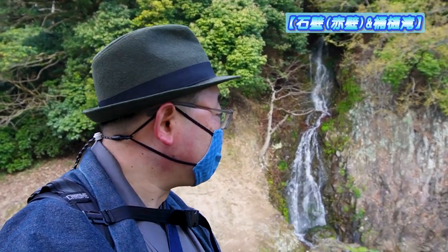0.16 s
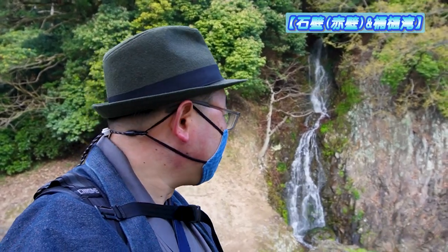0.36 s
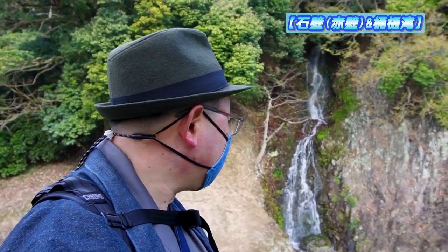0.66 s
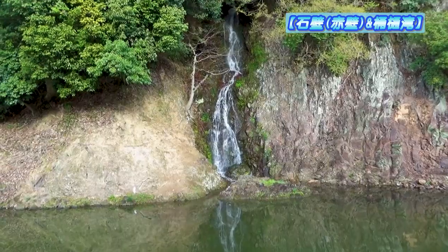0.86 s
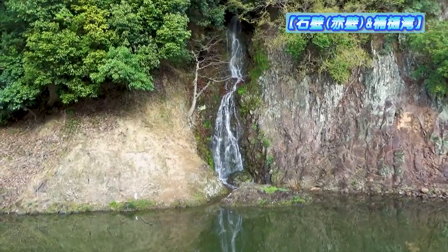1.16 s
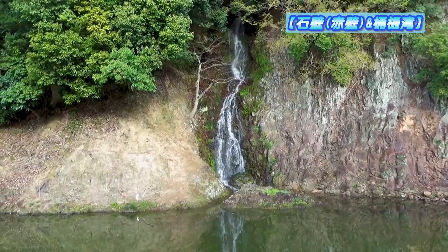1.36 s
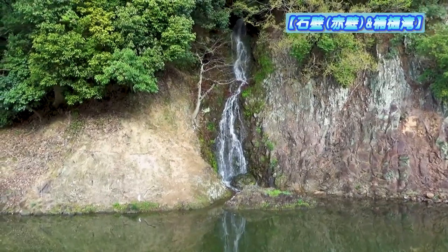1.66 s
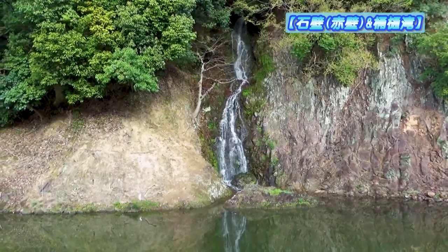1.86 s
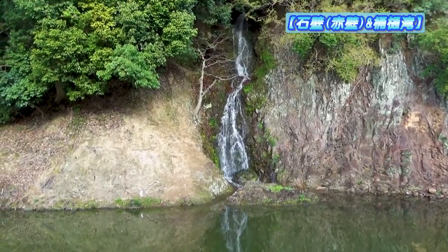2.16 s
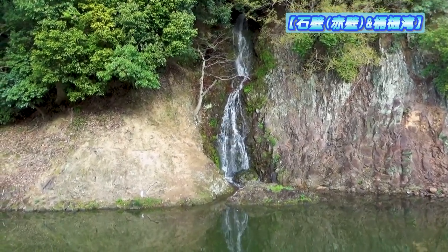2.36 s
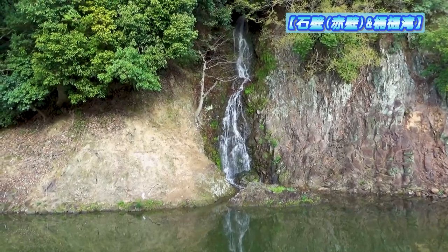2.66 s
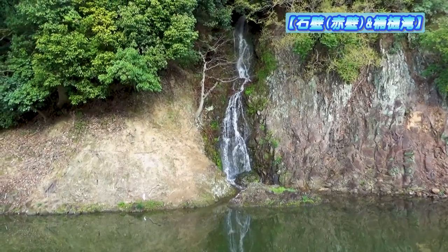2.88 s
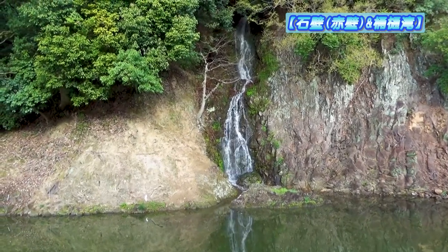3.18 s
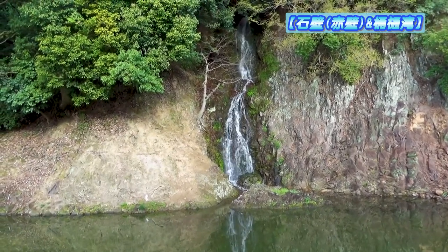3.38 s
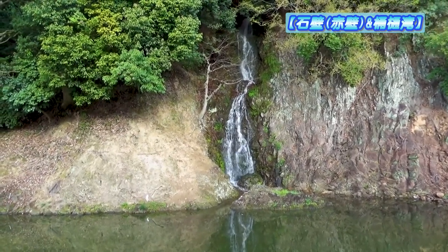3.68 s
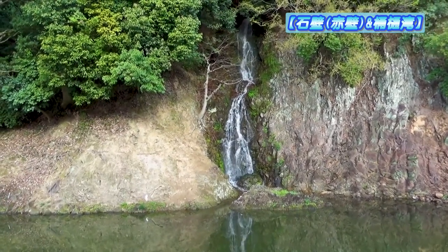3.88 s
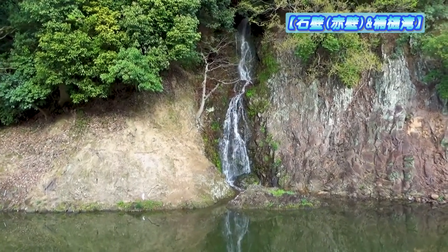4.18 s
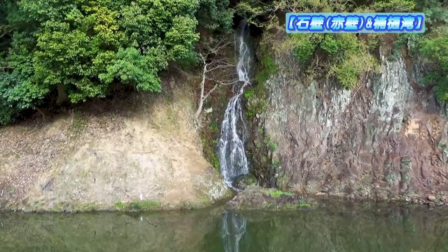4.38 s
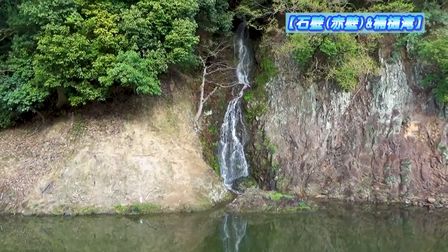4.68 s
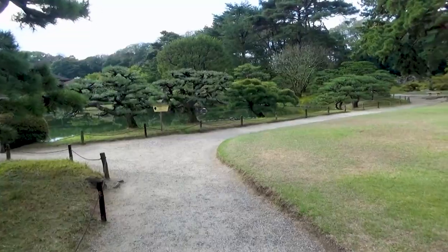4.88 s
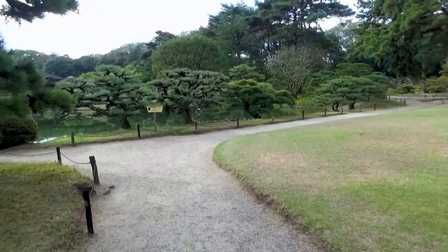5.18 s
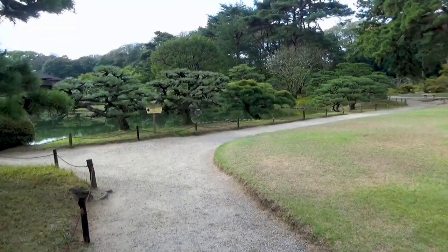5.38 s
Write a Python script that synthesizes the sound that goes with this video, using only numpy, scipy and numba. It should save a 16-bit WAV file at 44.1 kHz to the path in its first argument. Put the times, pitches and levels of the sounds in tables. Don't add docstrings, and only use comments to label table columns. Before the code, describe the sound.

A thin bright trickle jumps to a fuller steady rush of a small waterfall into a pond, then a duller, wider water wash with gravelly footsteps.

```python
import sys
import numpy as np
from scipy import signal
from scipy.fft import rfft, irfft, next_fast_len
from scipy.io import wavfile
from scipy.ndimage import uniform_filter1d
from numba import njit

SR = 44100
rng = np.random.default_rng(int(sys.argv[2]) if len(sys.argv) > 2 else 0)


def dump(signal):
    limited = np.clip(np.atleast_2d(signal).T, -1, 1)
    pcm = np.round(limited * 32767).astype(np.int16)
    wavfile.write(sys.argv[1], SR, pcm)


def decibels_to_gain(level_db):
    exponent = np.asarray(level_db, float) / 20
    return 10 ** exponent


N = 244049

# (start [s], end [s])
SPOT_TIMES = [
    (0, .79),
    (.79, 4.8),
    (4.8, 5.53),
]
# (fully in at [s], rise [dB/s], starts out at [s], fall [dB/s])
SPOT_FADES = [
    (0, 0, .7, 220),
    (.86, 207, 4.69, 141),
    (4.98, 75, 5.53, 0),
]
# (time [s], level [dB])
RUSH_FLOW = [
    [(0, -45), (.075, -48), (.13, -46), (.62, -47), (.7, -46.5)],
    [(.86, -50), (1.25, -49.5), (1.31, -49), (1.62, -48), (1.8, -47.5), (1.88, -47), (2.02, -48),
     (2.07, -46.5), (2.2, -46.5), (2.6, -46), (2.9, -45.5), (2.97, -44.5), (3.2, -43.5), (3.29, -45.5),
     (3.4, -44), (3.95, -44), (4.05, -42.5), (4.45, -42), (4.55, -44), (4.62, -44), (4.65, -45.5),
     (4.7, -48.5)],
    [(5.0, -46.5), (5.24, -45), (5.29, -45.5), (5.33, -44.5), (5.44, -46), (5.47, -44), (5.53, -48.5)],
]
# (frequency [Hz], level [dB per Hz])
BANK_COLOUR = [(24, -97), (40, -74), (76, -56), (150, -43.5), (320, -38.5), (687, -24), (1160, -15.5),
               (1590, -10), (2020, -6.5), (2880, -6), (4300, -7), (5910, -10.5), (8000, -17),
               (10500, -22.5), (12100, -32)]
FALL_COLOUR = [(24, -70), (40, -69), (78, -18.5), (132, -13.5), (492, -14.5), (894, -6.5), (1060, -10),
               (1280, -3.5), (1510, -5), (1750, -0.5), (2200, -2.5), (3300, -7), (4650, -9.5), (6000, -15),
               (6600, -12.5), (9150, -18), (10300, -14.5), (11200, -16), (12100, -22.5), (15700, -51),
               (22000, -120)]
PATH_COLOUR = [(30, -75.5), (100, -29), (178, -10), (260, -25), (408, -11.5), (481, -19.5), (542, -12),
               (934, -14), (1240, -9), (1500, -5.5), (1770, -2), (2300, -3.5), (5650, -11), (8860, -19),
               (12100, -27)]
# (frequency [Hz], level [dB per Hz])
BANK_MIST_COLOUR = [(12200, -2), (13500, -11), (14400, -17), (15000, -26)]
FALL_MIST_COLOUR = [(12200, -1), (13500, -8), (14500, -13), (15700, -22)]
PATH_MIST_COLOUR = [(12200, 0), (13000, -1), (14000, -7), (14300, -40)]
# (frequency [Hz], correlation [-1..1])
BANK_LIKENESS = [(60, 0.85), (130, 0.99), (290, 0.99), (640, 1), (1410, 0.99), (3100, 1), (6820, 0.93),
                 (15000, 0.73)]
FALL_LIKENESS = [(60, 1), (15000, 1)]
PATH_LIKENESS = [(60, .96), (160, .995), (380, .75), (800, .95), (1700, .99), (2400, .95), (3300, .72),
                 (5000, .75), (6820, .6), (10500, .1), (12000, -.2), (13500, -.4)]
# (frequency [Hz], difference [dB])
BANK_BALANCE = [(60, -3), (110, -4), (200, 0.0), (380, -1), (700, -2), (1290, -3), (2380, -3), (4400, -2),
                (8120, -3), (15000, -0.5)]
FALL_BALANCE = [(60, 0), (15000, 0)]
PATH_BALANCE = [(60, 0.5), (110, 0.5), (200, 0), (380, 0.5), (700, 3.0), (1290, 3.5), (2380, 4),
                (4400, 4.5), (8120, 0.5), (15000, -4)]
# (first level [dB], last level [dB], from [s], to [s])
MIST_DRIFT = [
    (-23, -33.5, .4, 0.83),
    (-14.5, -27, 0.95, 1.9),
    (-23, -28, 4.9, 5.05),
]
# (bass change [dB], treble change [dB], from [s], to [s])
TONE_DRIFT = [
    (-2.5, -0.5, 0.24, .6),
    (1.5, -4.5, 1, 1),
    (2, -9.5, 5, 5.06),
]
DEEP_BASS_FOLLOW = [4.0, .9, .9]
# (start [s], pitch [Hz], level [dB], t60 [s])
AIR_GULPS = [
    (2.74, 188.3, -57, 0.58),
    (3.46, 242, -54.5, 0.41),
    (4.051, 128, -56, .4),
]
# (time [s], peak level [dB], pitch [Hz])
GOUTS = [(0.937, -40, 2340), (1.1064, -40, 1820), (1.2885, -40, 2150), (1.41, -44, 1780),
         (1.5145, -38, 2150), (1.54, -41, 1730), (1.5992, -41, 1600), (1.6498, -38, 1800),
         (1.7075, -41, 1670), (1.7479, -40, 2070), (1.849, -37, 1870), (1.9394, -40, 2260),
         (2.0444, -38, 1640), (2.071, -36, 1710), (2.235, -36, 1640), (2.3411, -35, 1790),
         (2.6504, -40, 2620), (2.749, -38, 1780), (2.769, -40, 1620), (2.799, -38, 2660),
         (2.9532, -37, 1750), (2.9994, -40, 2300), (3.7354, -37, 1830), (3.8734, -35, 1740),
         (3.922, -37, 1700), (3.9845, -37, 1740), (4.0165, -43, 2290), (4.0594, -30, 2410),
         (4.3094, -37.5, 2110), (4.3864, -39, 1580), (4.4294, -33, 2020), (4.4544, -36, 2450),
         (4.5682, -33, 1780), (4.6024, -32.5, 1870), (4.6694, -39, 1820), (4.6944, -44, 1950)]
# (end [s], length as a negative [s], last pitch [Hz], first pitch [Hz], level [dB])
WHISTLING_JET = (4.435, -0.2, 2520, 2331, -53)
# (start [s], length [s], first pitch [Hz], highest pitch [Hz], last pitch [Hz])
BIRD_CALLS = [
    (4.888, .086, 3380, 3660, 3050),
    (5.454, 0.044, 4350, 4750, 4800),
]
# (time [s], blow [dB], brightness [dB])
STONE_BLOWS = [
    (5.028, -54, 0),
    (5.075, -52, 3),
    (5.346, -48, 3),
    (5.3585, -44, -1),
    (5.3605, -42, -1),
    (5.3638, -44, 3),
    (5.3646, -43, 3),
    (5.3655, -42, 2),
]
# (pitch [Hz], level [dB], t60 [s])
STONE_MODES = [(370, -9, .04), (545, -10, .04), (820, -9, .03), (1250, -10, .02), (1650, -16, .015),
               (2050, 1, .03), (2350, 3, .022), (3200, -3, .011), (3900, 6, .022), (4950, 2, .018),
               (6500, -8, .008)]
# (time [s], pitch [Hz], level [dB], t60 [s])
SOLE_THUDS = [(4.975, 191, -46, .4), (5.075, 188, -45, 0.22), (5.16, 180, -45, .2), (5.215, 190, -40, 0.16),
              (5.301, 174, -45, 0.22), (5.022, 645, -59, .12), (5.072, 814, -56, .1),
              (5.082, 410, -48, .12), (5.105, 356, -55, .1), (5.144, 395, -48, 0.088),
              (5.204, 420, -51, 0.11), (5.212, 550, -50.5, 0.16), (5.222, 400, -55, .1),
              (5.265, 1264, -47, .1), (5.272, 800, -58, 0.11), (5.356, 820, -45, .09),
              (5.357, 385, -46, .1), (5.358, 560, -51, .07)]
# (time [s], low edge [Hz], high edge [Hz], level [dB])
SIDE_FLASHES = [
    (1.895, 6300, 8300, -63),
    (2.5, 4700, 5700, -61),
    (2.825, 9600, 11100, -63),
    (3.5, 11000, 12400, -67),
    (4.245, 6300, 7600, -58),
]
# (time [s], frequency [Hz])
CENTRE_CEILING = [(4.66, 15700), (4.72, 15100), (4.76, 14300), (4.8, 13500), (4.825, 12400), (4.86, 13000),
                  (4.95, 12800), (4.99, 12500), (5.08, 13100), (5.12, 12400), (5.2, 11800), (5.255, 11600),
                  (5.275, 13100), (5.36, 13300), (5.4, 14000), (5.45, 13000), (5.49, 12400), (5.53, 12800)]

MIST_EDGE_HZ = 12170


def on_log(table, hz):
    f, v = np.transpose(table)
    return np.interp(np.log(hz + 1), np.log(f), v)


def unit(x):
    return x / np.sqrt(np.mean(x ** 2))


def walk(rate, size):
    hold = int(SR / rate)
    w = np.repeat(rng.standard_normal(size // hold + 1), hold)
    w = uniform_filter1d(uniform_filter1d(w, hold), hold)[:size]
    return unit(w - uniform_filter1d(w, size=4 * hold))


@njit
def rings(size, at, step, decay, glide, gain):
    y = np.zeros(size)
    for k in range(len(at)):
        i, a, phase, w = at[k], 1., 0., step[k]
        while a > .004 and i < size:
            y[i] += gain[k] * a * np.sin(phase)
            i, a, phase, w = i + 1, a * decay[k], phase + w, w * glide[k]
    return y


def fade(t, spot):
    full, rise, leave, fall = SPOT_FADES[spot]
    return -rise * np.clip(full - t, 0, 1) - fall * np.clip(t - leave, 0, 1)


def pump():
    hum_hz, hum_db, strain_db, eases_s = 140.8, -78.5, 2, 2.4
    t, start = np.arange(N) / SR, SPOT_FADES[1][0]
    climb = (2 * t - start - eases_s) / (eases_s - start)
    strain = np.where(t < eases_s, climb, np.clip(1 - (t - eases_s) / 0.77, 0, 1))
    level_db = hum_db + strain_db * strain + 2 * fade(t, spot=1) + 2.5 * walk(12.0, N)
    phase = 2 * np.pi * np.cumsum(hum_hz * (1 + 0.022 * walk(8.0, N))) / SR
    return np.sqrt(2) * decibels_to_gain(level_db) * np.sin(phase)


def bird():
    t, out = np.arange(N) / SR, 0
    peak = .56
    for (s, length, first_hz, top_hz, last_hz), db in zip(BIRD_CALLS, (-58, -63)):
        u = np.clip((t - s) / length, 0, 1)
        below_rising = (top_hz - first_hz) * (1 - u / peak) ** 2
        below_falling = (top_hz - last_hz) * (np.clip(u - peak, 0, 1) / (1 - peak)) ** 2.5
        hz = top_hz - np.where(u < peak, below_rising, below_falling)
        phase = 2 * np.pi * np.cumsum(hz * (1 + .006 * walk(150.0, N))) / SR
        swell = np.sin(np.pi * u).clip(0) ** 0.35 * (1 + .5 * u)
        out = out + np.sqrt(2) * decibels_to_gain(db + 2.2 * walk(90.0, N)) * swell * np.cos(phase)
    return out * decibels_to_gain(np.array([[3.0], [-3.0]]))


def stone_knocks():
    grit_db, grit_s = -6, .005
    hz, db, t60 = np.transpose(STONE_MODES)
    s, blow_db, bright_db = np.transpose(STONE_BLOWS)[:, :, None]
    chance = rng.standard_normal((len(STONE_BLOWS), 2, len(STONE_MODES)))
    bright = bright_db * on_log([(400, 0), (2000, 1)], hz)
    gain = decibels_to_gain(blow_db + db + bright + 1.5 * chance[:, 0])
    step = 2 * np.pi * hz * (1 + .025 * chance[:, 1]) / SR
    at = (s * SR + 0 * hz).astype(np.int64)
    decay = np.exp(-np.log(1000) / (t60 * SR)) + 0 * s
    ringing = rings(N, at.ravel(), step.ravel(), decay.ravel(), np.ones(at.size), gain.ravel())
    blows = np.bincount(at[:, 0], decibels_to_gain(blow_db + bright_db + grit_db)[:, 0], N)
    grit = signal.lfilter([1], [1, -np.exp(-1 / (grit_s * SR))], blows) * rng.standard_normal(N)
    return ringing + grit


def sole_thuds():
    t, out = np.arange(N) / SR, np.zeros(N)
    for s, hz, db, t60 in SOLE_THUDS:
        age = np.clip(t - s, 0, None)
        swell = 2 * decibels_to_gain(db - 60 * age / t60) * (1 - np.exp(-age / 0.0051))
        out += swell * np.sin(2 * np.pi * hz * age * (1 - .5 * age))
    return out


def footstep():
    contact = signal.butter(3, [320, 7500], "bandpass", fs=SR, output="sos")
    y = signal.sosfilt(contact, stone_knocks() + sole_thuds())
    return np.array([y, np.roll(y, 2)]) * decibels_to_gain(np.array([[2.0], [-2.0]])) / 2


def gulps():
    t, out = np.arange(N) / SR, np.zeros(N)
    for s, hz, db, t60 in AIR_GULPS:
        age = np.clip(t - s, 0, None)
        swell = decibels_to_gain(db - 60 * age / t60) * (1 - np.exp(-age / 0.019))
        out += swell * np.sin(2 * np.pi * hz * age * (1 + 0.16 * age))
    return out


def splashes(count=7):
    level_db, rush_s, cycles, pitch_spread = -8, .015, 9.0, .12
    s, db, hz = np.transpose(GOUTS)[:, :, None]
    u = rng.random((len(GOUTS), 3, count))
    hz = hz * (1 + pitch_spread * (2 * u[:, 0] - 1))
    life = cycles * SR / hz
    at = ((s - rush_s * np.log(1 - .9 * u[:, 1])) * SR).astype(np.int64)
    gain = decibels_to_gain(db + level_db - 7.1 * u[:, 2])
    step, decay, glide = 2 * np.pi * hz / SR, np.exp(-1 / life), 1.05 ** (.5 / life)
    out = rings(N, at.ravel(), step.ravel(), decay.ravel(), glide.ravel(), gain.ravel())
    return signal.sosfilt(signal.butter(2, 900, "highpass", fs=SR, output="sos"), out)


def jet():
    s, length, first_hz, last_hz, db = WHISTLING_JET
    u = np.clip((np.arange(N) / SR - s) / length, 0, 1)
    hz = (first_hz + (last_hz - first_hz) * u) * (1 + 0.012 * walk(120.0, N))
    swell = np.sqrt(2 * np.sin(np.pi * u).clip(0))
    return decibels_to_gain(db + 3 * walk(80.0, N)) * swell * np.sin(2 * np.pi * np.cumsum(hz) / SR)


def churn(size, rate=5000, cycles=5.0, rise=.2, spread_db=1.8, bubble_db=-8.0):
    when, pitch, strength = rng.random((int(rate * size / SR), 3)).T
    hz = 200 * (14000 / 200) ** pitch
    life = cycles * SR / hz
    gain = hz * decibels_to_gain(-spread_db * np.log(1 - .995 * strength))
    at, step = (when * size).astype(np.int64), 2 * np.pi * hz / SR
    bubbles = rings(size, at, step, np.exp(-2 / life), (1 + rise) ** (.5 / life), gain)
    return decibels_to_gain(bubble_db) * unit(bubbles) + rng.standard_normal(size)


def wide_churn(size, fft_size, hz, alike, lean, lead_us):
    c = np.clip(on_log(alike, hz), -1, 1)
    mid = rfft(churn(size), fft_size) * np.sqrt((1 + c) / 2)
    side = rfft(churn(size), fft_size) * np.sqrt((1 - c) / 2)
    tilt = decibels_to_gain(on_log(lean, hz) / 2) * np.exp(1j * np.pi * hz * lead_us * 1e-6)
    return np.array([(mid + side) * tilt, (mid - side) / tilt])


def cascade(spot, colour, mist, alike, lean, lead_us, swell_db, patch_db, flicker_db):
    start, end = SPOT_TIMES[spot]
    i0, i1 = max(int((start - .1) * SR), 0), min(int((end + .1) * SR), N)
    size = i1 - i0
    fft_size = next_fast_len(size)
    t, hz = np.arange(i0, i1) / SR, np.fft.rfftfreq(fft_size, 1 / SR)
    first_db, last_db, *mist_times = MIST_DRIFT[spot]
    rush_db = np.interp(t, *np.transpose(RUSH_FLOW[spot])) + fade(t, spot)
    mist_db = rush_db + np.interp(t, mist_times, (first_db, last_db))

    pair = wide_churn(size, fft_size, hz, alike, lean, lead_us)
    body = pair * decibels_to_gain(on_log(colour, hz)) * (hz < MIST_EDGE_HZ)
    core = (hz > 1000) & (hz < 6000)
    body /= irfft(body.mean(axis=0) * core, fft_size)[:size].std()
    top = irfft(pair * decibels_to_gain(on_log(mist, hz)) * (hz >= MIST_EDGE_HZ), fft_size)[:, :size]
    swell = swell_db * walk(22.0, size)
    out = top / top.std() * decibels_to_gain(mist_db + swell + flicker_db * walk(14.0, size))

    bass_db, treble_db, *drift_times = TONE_DRIFT[spot]
    drift = np.interp(t, drift_times, (-.5, .5))
    low_db = bass_db * drift + 0.6 * walk(6.9, size)
    high_db = treble_db * drift + 0.069 * fade(t, spot)
    centres = np.geomspace(40, MIST_EDGE_HZ, num=17)
    patches = [walk(18.0, size) for _ in range(5)]
    for k, centre in enumerate(centres):
        share = on_log(np.transpose([centres, np.arange(17) == k]), hz)
        plunge = on_log([(90, DEEP_BASS_FOLLOW[spot]), (400, 0.66), (1200, 0.013)], centre)
        spray = on_log([(4500, 0.14), (8000, 0.41)], centre)
        j, part = divmod(k / 4, 1)
        patch = (1 - part) * patches[int(j)] + part * patches[min(int(j) + 1, 4)]
        db = rush_db + plunge * low_db + spray * high_db + swell
        db = db + patch_db * patch + flicker_db * walk(14.0, size)
        out += irfft(body * share, fft_size)[:, :size] * decibels_to_gain(db)

    fade_db = -250 * (np.clip(start - .01 - t, 0, 1) + np.clip(t - .01 - end, 0, 1))
    full = np.zeros((2, N))
    full[:, i0:i1] = out * decibels_to_gain(fade_db)
    return full


def scene():
    bank = cascade(0, BANK_COLOUR, BANK_MIST_COLOUR, BANK_LIKENESS, BANK_BALANCE,
                   lead_us=0, swell_db=.4, patch_db=.4, flicker_db=.5)
    fall = cascade(1, FALL_COLOUR, FALL_MIST_COLOUR, FALL_LIKENESS, FALL_BALANCE,
                   lead_us=0, swell_db=.35, patch_db=.35, flicker_db=.45)
    path = cascade(2, PATH_COLOUR, PATH_MIST_COLOUR, PATH_LIKENESS, PATH_BALANCE,
                   lead_us=8.0, swell_db=.4, patch_db=.5, flicker_db=.6)
    return pump() + bird() + footstep() + gulps() + splashes() + jet() + bank + fall + path


def lost_treble(mid, holes=.45, holes_hz=11000, band_hz=350):
    bank_ceiling_hz, ragged_hz = 14500, 350
    holes_s = 5.0
    top_hz, flickers_s, top_lost = 15150, 1.45, .7
    hz, t, z = signal.stft(mid, SR, nperseg=2048, noverlap=1024)
    at_bank, early = t < SPOT_TIMES[0][1], t < CENTRE_CEILING[0][0]
    ceiling = np.where(early, SR, np.interp(t, *np.transpose(CENTRE_CEILING)))
    ceiling = np.where(at_bank, bank_ceiling_hz, ceiling)
    ceiling = band_hz * np.round((ceiling + ragged_hz * rng.standard_normal(len(t)) * at_bank) / band_hz)
    gone = (rng.random(len(t)) < top_lost) & early & (t > flickers_s)
    ceiling = np.where(gone, np.minimum(ceiling, top_hz), ceiling)
    band = (hz // band_hz).astype(int)
    empty = rng.random((band.max() + 1, len(t)))[band] < holes
    hz = hz[:, None]
    late_holes = empty & (hz > holes_hz) & (t > holes_s)
    top_holes = empty & (hz > top_hz - 2 * band_hz) & gone
    lost = (hz > ceiling) | late_holes | top_holes
    return signal.istft(z * lost, SR, nperseg=2048, noverlap=1024)[1][:N]


def side_flashes():
    t, apart = np.arange(N) / SR, 0
    for s, low_hz, high_hz, db in SIDE_FLASHES:
        sos = signal.cheby1(8, 1, [low_hz, high_hz], "bandpass", fs=SR, output="sos")
        band = signal.sosfilt(sos, rng.standard_normal(N))
        window = np.cos(np.pi / 2 * np.clip((t - s) / 0.019, -1, 1)) ** 2
        apart = apart + decibels_to_gain(db) * unit(band) * window
    return apart * np.array([[1], [-1]])


def top_cut(x):
    return signal.sosfilt(signal.butter(12, 15720, fs=SR, output="sos"), x)


def record(dry):
    mix = dry - lost_treble(dry.mean(axis=0)) + side_flashes()
    return top_cut(mix)


dry = scene()
out = record(dry)
dump(out)
```